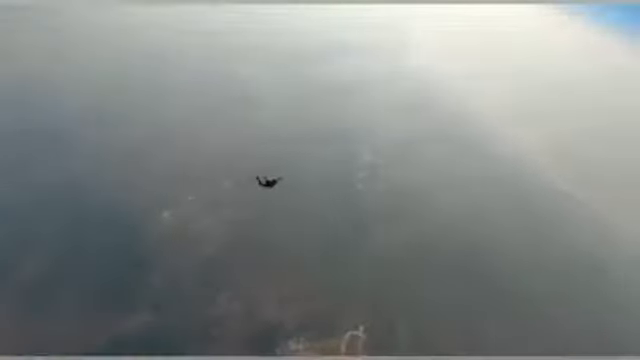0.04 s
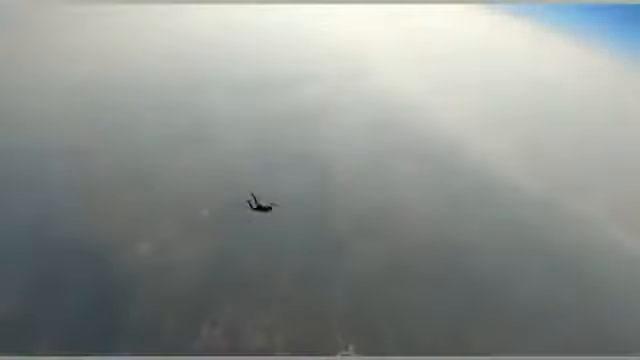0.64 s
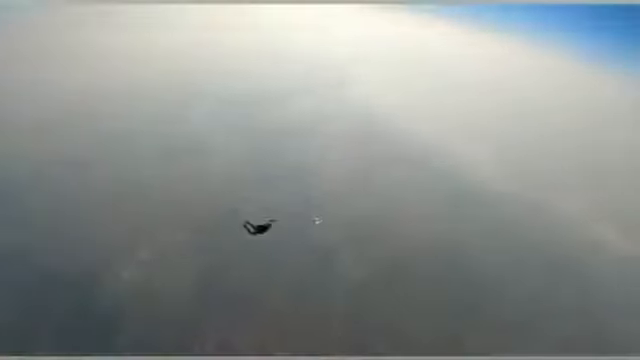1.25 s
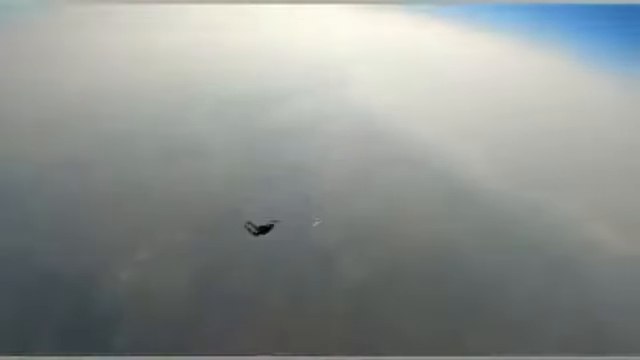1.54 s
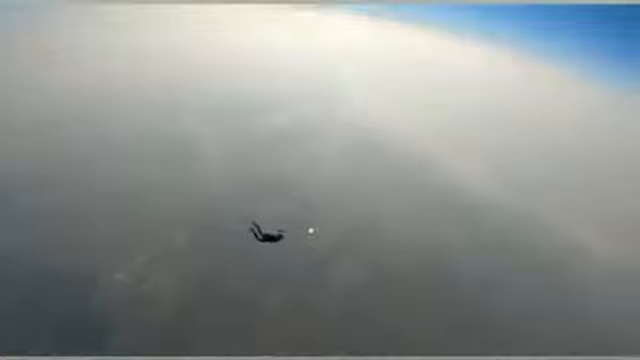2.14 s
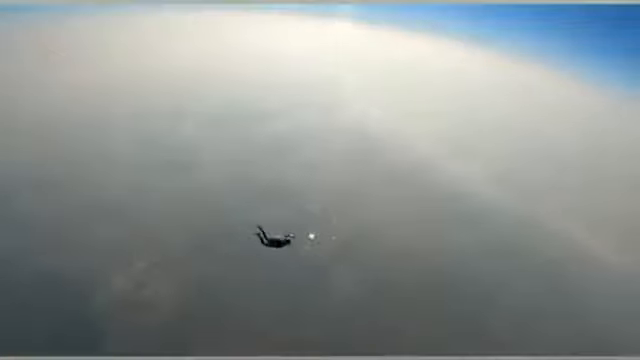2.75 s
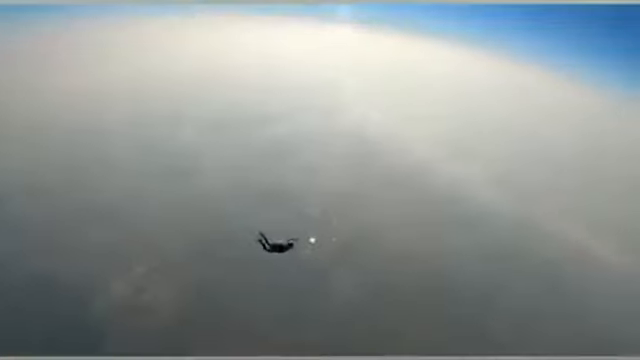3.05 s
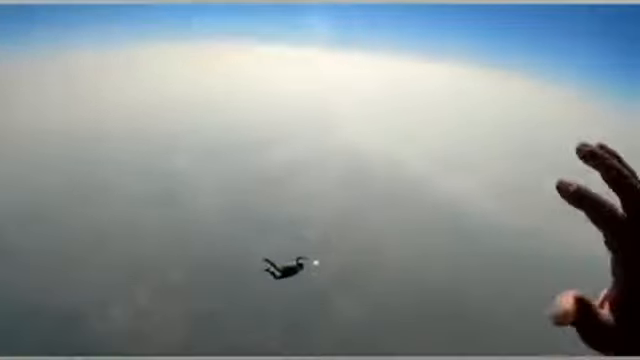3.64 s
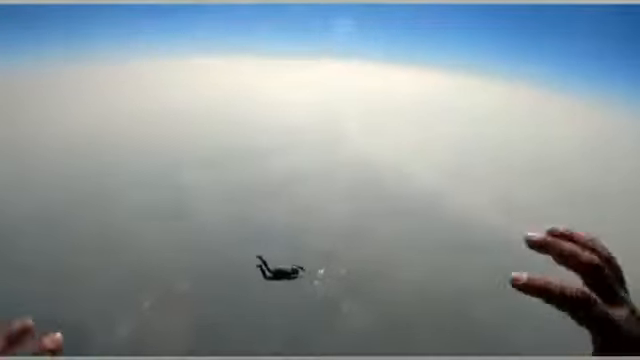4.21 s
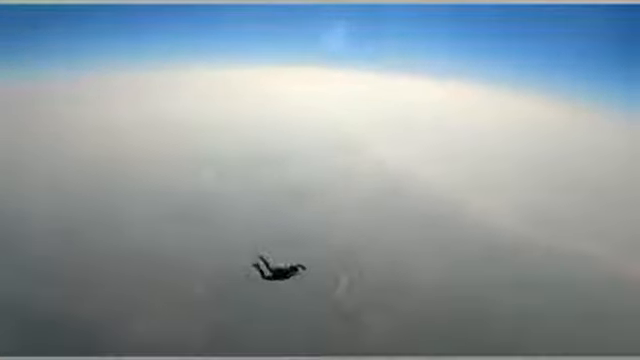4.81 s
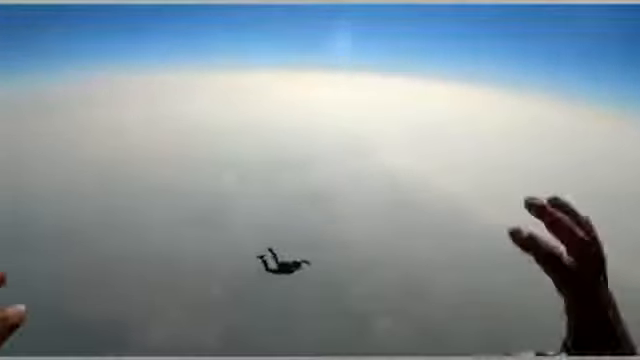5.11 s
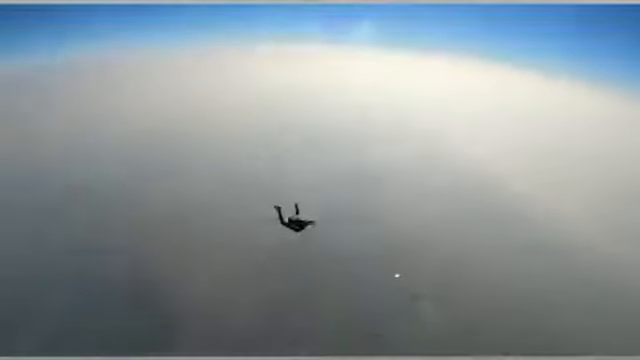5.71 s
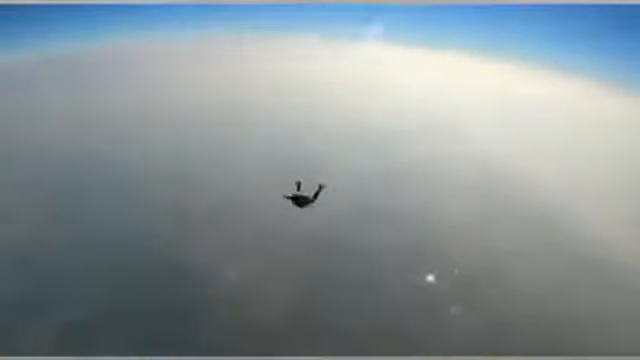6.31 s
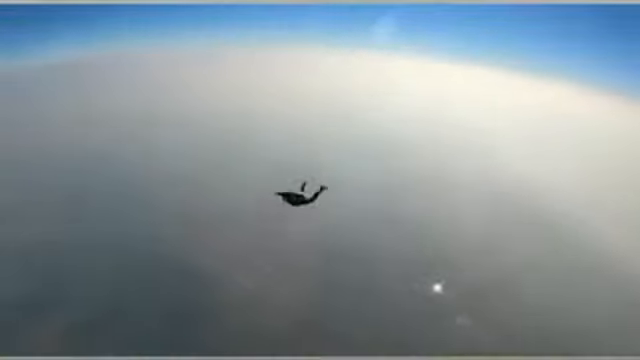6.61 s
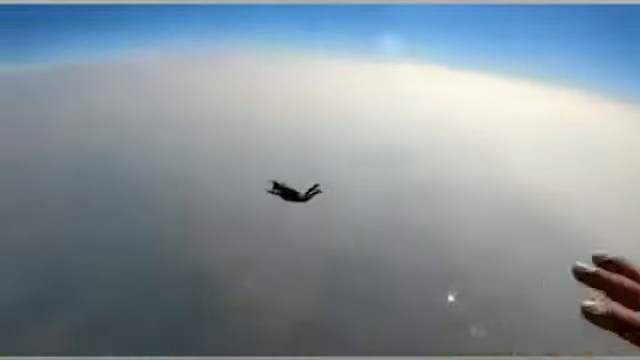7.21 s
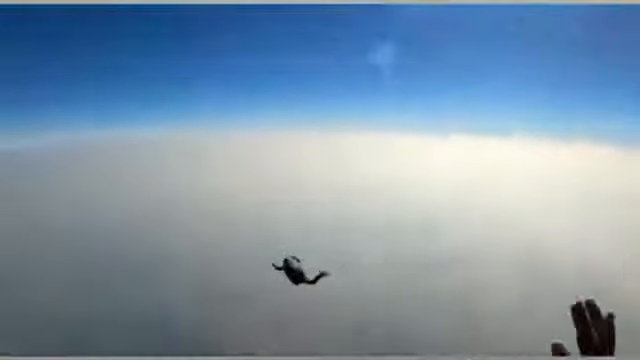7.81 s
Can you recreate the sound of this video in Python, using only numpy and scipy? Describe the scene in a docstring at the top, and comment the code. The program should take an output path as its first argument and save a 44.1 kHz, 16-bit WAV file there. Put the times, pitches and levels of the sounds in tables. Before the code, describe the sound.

Loud wind roars and buffets a skydiver's microphone in freefall, with a sliding howl, hiss and one brief dropout.

```python
"""Open sky, in freefall: the airstream tears past a camera worn by a skydiver.
Eddies buffet the microphone, air skimming a cavity drones, the helmet's wake roars and the port hisses.
A broad howl slides in pitch as the head turns. Lulls cut the roar as the stream lifts off the helmet;
hiss surges as air strikes the port squarely. The sound drops out for half a second and returns dull."""
import sys
import numpy as np
from scipy import signal
from scipy.fft import rfft, irfft, next_fast_len
from scipy.io import wavfile
from scipy.ndimage import uniform_filter1d, minimum_filter1d, map_coordinates

SR = 44100
rng = np.random.default_rng(int(sys.argv[2]) if len(sys.argv) > 2 else 0)


def to_wav(sig):
    """Store sig (one row per channel, or 1-D mono) as 16-bit WAV at the path in sys.argv[1].

    Samples outside -1..1 are clipped; the rate is SR.
    """
    pcm = np.clip(np.atleast_2d(sig), -1, 1) * 32767
    pcm = np.round(pcm).astype(np.int16)
    wavfile.write(sys.argv[1], SR, pcm.T)  # frames by channels


N = 346626
TIME_S = np.arange(N) / SR


def amp(db):
    """Decibels to gain."""
    return 10 ** (np.asarray(db) / 20)


def unit_rms(x):
    return x / np.sqrt(np.mean(x ** 2) + 1e-20)


def curves(table):
    """Per-sample curve for each column after time_s."""
    time_s, *columns = np.transpose(table)
    return [np.interp(TIME_S, time_s, column) for column in columns]


def swell(start_s, end_s, edge_s):
    """Trapezoid, 0 to 1; half height at start_s and end_s."""
    return np.clip(0.5 + np.minimum(TIME_S - start_s, end_s - TIME_S) / edge_s, 0, 1)


def arch(peak_s, length_s):
    """Half-cosine pulse, height 1."""
    return np.cos(np.pi * np.clip((TIME_S - peak_s) / length_s, -0.5, 0.5))


def wobble(rate_hz):
    """Smooth random curve, rate_hz knots a second."""
    knots = rng.standard_normal(int(N * rate_hz / SR) + 4)
    return map_coordinates(knots, [TIME_S * rate_hz])


def filtered(x, response):
    """FFT filter; response maps Hz to gain."""
    size = next_fast_len(N + SR // 2)
    hz = np.fft.rfftfreq(size, 1 / SR)
    return irfft(rfft(x, size) * response(hz), size)[:N]


def turbulence(spectrum):
    """Coloured noise, running rms held at 1."""
    freq_hz, level_db = np.transpose(spectrum)
    colour = lambda hz: amp(np.interp(np.log(hz + 1), np.log(freq_hz), level_db, left=-120, right=-120))
    noise = filtered(rng.standard_normal(N), colour)
    power = np.abs(uniform_filter1d(noise ** 2, size=SR // 8))
    return noise / np.sqrt(power + 1e-20)


def swept_resonance(x, centre_hz, width_oct, boost_db, fft_size):
    """Broad peak sliding along centre_hz."""
    hz, frame_s, frames = signal.stft(x, SR, nperseg=fft_size)
    offset_oct = np.log2((hz[:, None] + 1) / np.interp(frame_s, TIME_S, centre_hz))
    gain = amp(boost_db * np.exp(-(offset_oct / width_oct) ** 2))
    return signal.istft(frames * gain, SR, nperseg=fft_size)[1][:N]


# Buffeting spectra: freq_hz, level_db
THROB_SPECTRUM = [(40, -18), (68, -2), (90, -2), (115, -2.5), (150, -5), (220, -15), (600, -47)]
RUMBLE_SPECTRUM = [(10, -22.5), (24, -6), (42, -7), (58, 3), (75, -10), (130, -30.5)]
# Large eddies, relative levels: time_s, rumble_db, throb_db, throb_hz
LARGE_EDDIES = [(0, -27, -21.5, 115), (1.2, -29.5, -19.5, 100), (2.0, -29, -20, 135), (2.8, -25, -20, 120),
                (3.4, -25.5, -19, 110), (3.95, -24.5, -16.5, 108), (4.85, -24, -20, 100),
                (5.5, -21.5, -19.5, 114), (6.05, -21, -21, 124.7), (6.5, -24, -19, 106),
                (7.0, -24.5, -20, 120), (7.45, -24.5, -19.5, 128), (7.65, -20.5, -20, 138),
                (7.86, -21.5, -18, 130)]

def buffeting(lull):
    """Large eddies push on the diaphragm: a wandering throb over a rumble that swells in lulls."""
    rumble_db, throb_db, throb_hz = curves(LARGE_EDDIES)
    eddies = turbulence(THROB_SPECTRUM)
    eddies = swept_resonance(eddies, throb_hz, width_oct=0.34, boost_db=3.5, fft_size=4096)
    throb = amp(throb_db - 0.5 + 0.81 * wobble(9)) * unit_rms(eddies)
    lull_rise_db = 1
    rumble = amp(rumble_db - 1.5 + lull_rise_db * lull + 0.89 * wobble(8)) * turbulence(RUMBLE_SPECTRUM)
    return throb + rumble


# Cavity resonance: pitch_ratio, level_db
CAVITY_SPECTRUM = [(.6, -23), (.88, -5), (1, 2), (1.14, 2), (1.6, -30)]
# Air catching the cavity: start_s, end_s, pitch_hz, level_db
CAVITY_CATCHES = [(0, .42, 172, -25.5), (.45, .75, 162, -24), (.68, .92, 255, -21),
                  (0.897, 1.45, 193, -26.5), (1.15, 1.451, 275, -22.5), (1.848, 2.25, 156, -23),
                  (2.002, 2.55, 217, -25), (6.95, 7.35, 193, -27.5), (7.603, 7.86, 202, -28)]

def cavity_drone():
    """Air skimming an opening excites a fuzzy resonance, at a new pitch each catch."""
    drone = np.zeros(N)
    for start_s, end_s, pitch_hz, level_db in CAVITY_CATCHES:
        spectrum = [(ratio * pitch_hz, db) for ratio, db in CAVITY_SPECTRUM]
        drone += amp(level_db) * swell(start_s, end_s, edge_s=0.3) * turbulence(spectrum)
    return drone


# Roar spectrum: freq_hz, level_db
ROAR_SPECTRUM = [(70, -23.5), (165, 0.5), (270, -1.5), (380, -3), (520, -4.5), (700, -6.5), (1100, -17.5),
                 (2000, -23.5), (4000, -39.5), (8000, -64.5)]
# Wake strength: time_s, level_db
WAKE_STRENGTH = [(0, -17.5), (1.1, -18.5), (2.35, -18), (2.65, -18.5), (3.2, -18.5), (4.2, -20.5),
                 (5.0, -18), (5.9, -18), (6.45, -21), (6.75, -18), (7.3, -18), (7.86, -18.5)]

def wake_roar(flutter, lull, lull_cut_db=8):
    """The wake behind the helmet roars, giving way in lulls."""
    level_db, = curves(WAKE_STRENGTH)
    roar = amp(0.41 * flutter + 0.44 * wobble(16)) * turbulence(ROAR_SPECTRUM)
    return amp(level_db - lull_cut_db * lull) * unit_rms(roar)


# Howl spectrum: freq_hz, level_db
HOWL_SPECTRUM = [(300, -22), (620, -5.5), (850, 1), (1120, 0), (1500, -6.5), (2100, -14.5), (4000, -32),
                 (8000, -57.5)]
# Howl as the head turns in the flow: time_s, centre_hz, relative_db
HOWL_PATH = [(0, 1394, -23.5), (0.9, 1396, -26), (1.9, 1000, -19.5), (2.25, 1050, -23), (2.72, 1120, -22),
             (2.9, 1300, -23), (3.15, 1400, -21.5), (3.9, 1250, -20.5), (4.45, 820, -21.5),
             (4.83, 830, -22.5), (5.4, 640, -23.5), (5.9, 880, -22), (6.5, 1060, -18), (6.8, 1080, -20.5),
             (7.05, 960, -23), (7.38, 900, -22), (7.53, 1380, -20)]

def helmet_howl(flutter, lull, lull_cut_db=7):
    """Eddies shed from the helmet make a broad, sliding howl that gives way in lulls."""
    centre_hz, relative_db = curves(HOWL_PATH)
    shedding = turbulence(HOWL_SPECTRUM)
    shedding = swept_resonance(shedding, centre_hz, width_oct=0.53, boost_db=2, fft_size=1024)
    howl = amp(0.44 * flutter + 0.49 * wobble(16)) * shedding
    return amp(relative_db - 2.15 - lull_cut_db * lull) * unit_rms(howl)


# Port spectra: freq_hz, level_db
HISS_SPECTRUM = [(700, -11), (1400, 4), (2000, 2), (3200, 0), (4200, -4), (5200, -9.5), (6500, -16.5),
                 (7900, -25), (9300, -23.5), (10800, -33), (12200, -43.5), (14500, -50)]
FIZZ_SPECTRUM = [(5000, -9), (8000, -9.5), (9300, -5), (10800, -2.5), (12200, -10), (14500, -26.5)]
# How squarely air meets the port: time_s, relative_db
PORT_EXPOSURE = [(0, -29.5), (0.9, -29), (1.35, -31), (2.4, -31), (2.67, -32), (2.8, -29.5), (3.2, -29.5),
                 (3.5, -30), (4.05, -30), (4.35, -31.5), (5.2, -31), (6.3, -33), (7.34, -33), (7.49, -33.5),
                 (7.57, -31.5), (7.86, -31.5)]

def port_hiss(flutter):
    """Small eddies tear at the port's edge: hiss, surges and faint fizz, all in quick spurts."""
    exposure_db, = curves(PORT_EXPOSURE)
    spurts = amp(0.4 * flutter + 0.28 * wobble(12) + 0.48 * wobble(110) + 1.05 * wobble(450))
    hiss = amp(exposure_db + 2.5) * turbulence(HISS_SPECTRUM) + port_surges()
    fizz = amp(-64.5) * turbulence(FIZZ_SPECTRUM)
    return spurts * (hiss + fizz)


# Gusts: peak_s, length_s, rise_db
WAKE_GUSTS = [(1.25, 0.16, 0.5), (2.41, 0.2, 1), (2.75, .1, 2), (4.8, 0.25, 0.5), (7.344, .18, 0.5)]

def gust_gain():
    """Gusts swell the roar and howl."""
    return amp(sum(rise_db * arch(peak_s, length_s) for peak_s, length_s, rise_db in WAKE_GUSTS))


def dropout(x, start_s, end_s, dull_until_s, dull_above_hz):
    """The sound cuts out, then returns briefly without its top treble."""
    treble = filtered(x, lambda hz: hz > dull_above_hz)
    dull = swell((start_s + end_s) / 2, dull_until_s, edge_s=0.005)
    drop_db, fade_db_per_s = 26, 860
    fade = amp(-drop_db - fade_db_per_s * np.maximum(TIME_S - start_s, 0))
    gate = np.where((TIME_S < start_s) | (TIME_S > end_s), 1, fade)
    return (x - dull * treble) * uniform_filter1d(gate, size=64)


# Lulls: start_s, length_s, depth
STREAM_LULLS = [(2.822, 0.075, 0.45), (2.98, 0.044, 0.3), (3.082, 0.048, 0.3), (3.169, 0.024, 0.6),
                (4.929, 0.035, 0.75), (5.008, 0.029, 0.4), (5.177, 0.034, 0.44), (5.546, 0.033, 1),
                (7.48, 0.028, 0.3), (7.51, 0.04, 1), (7.552, 0.11, 0.72), (7.668, 0.04, 0.85),
                (7.706, 0.14, 0.53)]

def lull_depth():
    """The stream lifts off the helmet and presses on the diaphragm instead; 1 is a full lull."""
    return sum(depth * swell(start_s, start_s + length_s, edge_s=0.02)
               for start_s, length_s, depth in STREAM_LULLS)


# Surge spectra: freq_hz, level_db
RASP_SPECTRUM = [(1200, 0.5), (2200, 4), (3200, -2), (4200, -11), (5500, -12), (8000, -32)]
FLARE_SPECTRUM = [(1200, -1), (2400, -3.5), (3400, 3.5), (4500, 0), (5500, -6), (7900, -19), (9300, -24),
                  (12200, -30), (14500, -45)]
# Hiss surges: peak_s, length_s, level_db, brightness
HISS_SURGES = [(2.845, 0.066, -32, 0.9), (2.905, 0.056, -35, 0.8), (3.012, 0.07, -26.5, 0.02),
               (3.13, 0.078, -31.5, 0.6), (3.186, 0.069, -27.5, 0.15), (5.0, .1, -38, .9),
               (5.043, 0.079, -29, .05), (7.25, 0.07, -30, 0), (7.618, 0.049, -30, 0.8),
               (7.675, 0.03, -30, 0.4), (7.72, 0.055, -29, 0.85), (7.823, 0.17, -33, .6)]

def port_surges():
    """Air strikes the port squarely: each surge blends low rasp with bright flare."""
    rasp, flare = turbulence(RASP_SPECTRUM), turbulence(FLARE_SPECTRUM)
    surges = np.zeros(N)
    for peak_s, length_s, level_db, brightness in HISS_SURGES:
        blend = np.sqrt(1 - brightness) * rasp + np.sqrt(brightness) * flare
        surges += amp(level_db) * arch(peak_s, length_s) * blend
    return surges


# Level dips: centre_s, length_s, change_db
LEVEL_DIPS = [(2.944, 0.053, -3), (3.3, 0.06, -0.5), (5.49, 0.06, -0.5), (7.498, 0.097, -2.6),
              (7.757, 0.039, -3.5)]

def dip_gain():
    """Roar, howl and hiss dip briefly together."""
    return amp(sum(db * arch(centre_s, length_s) for centre_s, length_s, db in LEVEL_DIPS))


def scene():
    """One unsteady airstream: roar, howl and hiss share its flutter."""
    flutter, lull = wobble(45), lull_depth()
    lows = buffeting(lull) + cavity_drone()
    wake = gust_gain() * (wake_roar(flutter, lull) + helmet_howl(flutter, lull))
    return (lows + dip_gain() * (wake + port_hiss(flutter)))[None]


def limiter(x, threshold_db, hold_s, ratio):
    """Gain ducks smoothly around peaks over the threshold."""
    span = int(hold_s * SR)
    gain = np.minimum(1, amp(threshold_db) / (np.abs(x) + 1e-9)) ** (1 - 1 / ratio)
    return x * uniform_filter1d(minimum_filter1d(gain, span), span)


def record(dry):
    """Camera: peak limiter, one dropout, band limit."""
    gain_db, top_hz = 0.56, 14900
    limited = limiter(amp(gain_db) * dry[0], threshold_db=-6.5, hold_s=0.0043, ratio=2)
    gated = dropout(limited, start_s=1.3635, end_s=1.888, dull_until_s=2.218, dull_above_hz=9800)
    return filtered(gated, lambda hz: hz < top_hz)[None]


dry = scene()
out = record(dry)
to_wav(out)
```